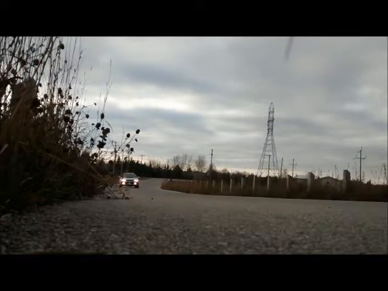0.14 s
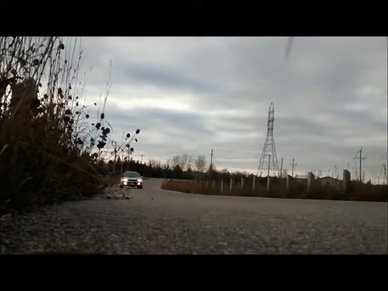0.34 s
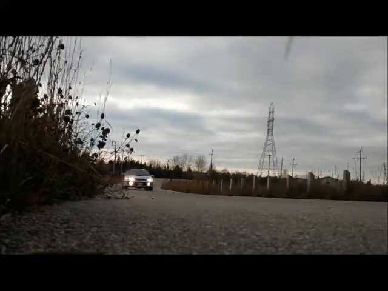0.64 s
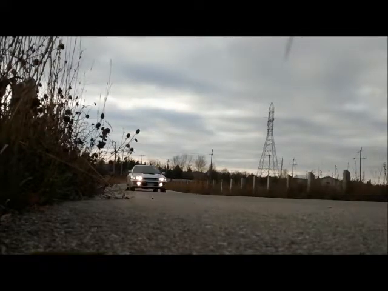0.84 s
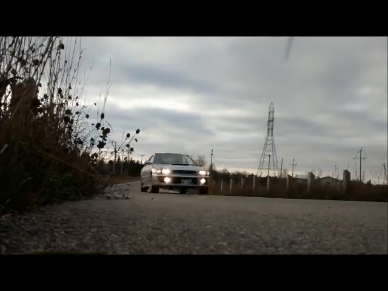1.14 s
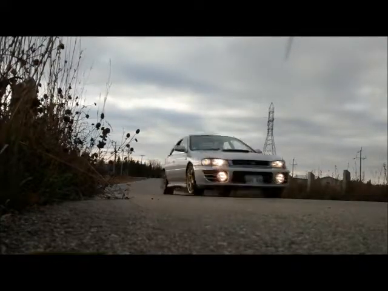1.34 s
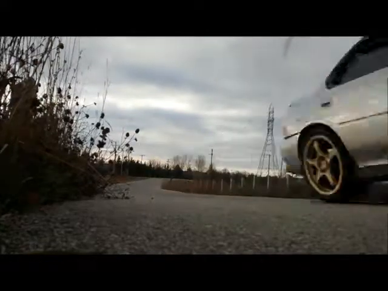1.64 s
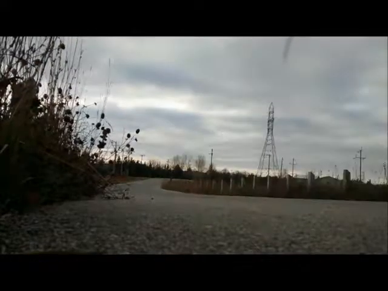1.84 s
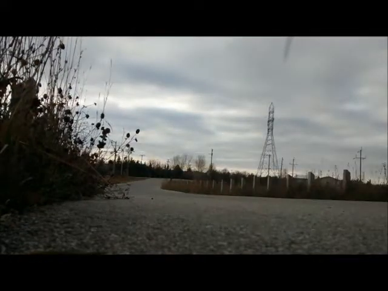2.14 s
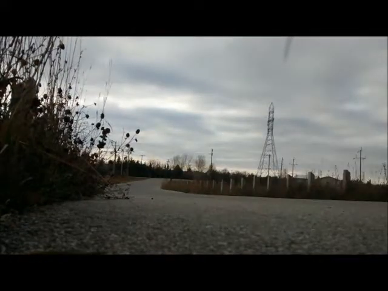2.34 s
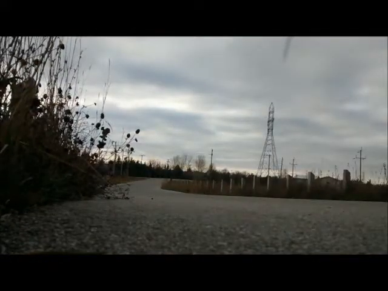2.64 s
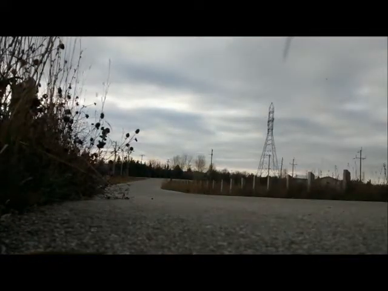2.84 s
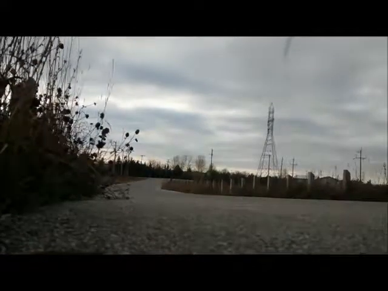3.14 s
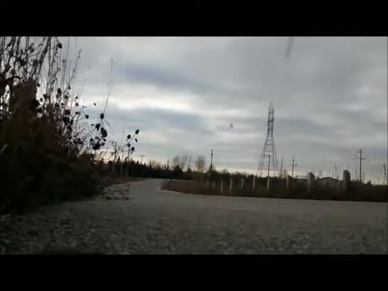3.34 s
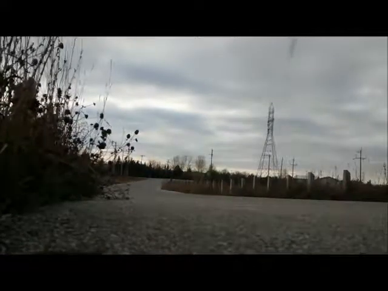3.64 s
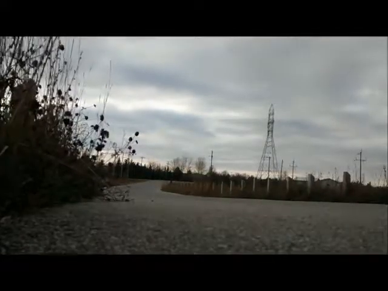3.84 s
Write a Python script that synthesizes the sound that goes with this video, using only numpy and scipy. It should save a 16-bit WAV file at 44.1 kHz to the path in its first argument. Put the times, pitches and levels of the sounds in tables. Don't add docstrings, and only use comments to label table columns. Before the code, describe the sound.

A throbbing four-cylinder car lifts off with an air hiss, passes loudly, then fades to idle.

```python
import sys
import numpy as np
from scipy import signal
from scipy.fft import rfft, irfft, next_fast_len
from scipy.io import wavfile
from scipy.ndimage import map_coordinates

SR = 44100
rng = np.random.default_rng(int(sys.argv[2]) if len(sys.argv) > 2 else 0)


def rack_gain(trim_db):
    fader = np.asarray(trim_db, float)
    return 10 ** (fader / 20)


def inscribe(sig):
    pcm = np.round(np.clip(np.atleast_2d(sig).T, -1, 1) * 32767)
    wavfile.write(sys.argv[1], SR, pcm.astype(np.int16))


N = 176400
TIME_S = np.arange(N) / SR
DUCK_DB = -11


# start_s, cycle_rate_hz, level_db, side_seen
ENGINE = [(0, 34.2, -10.5, 0), (.855, 39, -8.5, 0), (.9, 36.6, -11, 1), (1.1, 33.3, -7.5, 1),
          (1.46, 28.1, -6, 1), (1.66, 25.1, -7, 1.25), (1.8, 23, -3.5, 1.9), (1.97, 20.1, -1, 2),
          (2.16, 17.1, -7, 2), (2.36, 15.1, -15, 2.15), (2.56, 13.1, -18, 2.7), (2.76, 11.2, -24, 3),
          (2.96, 9.5, -25, 3.2), (3.3, 8.8, -29, 4), (3.6, 8, -39, 4), (4, 8, -38, 4)]
ORDER_DB = [
    [-25, -19, -10, 0, -6, -17, -24, -11, -13, -26, -30, -18, -17, -33, -26, -24, -27],
    [-30, -26, 0, -6, -16, -26, -20, -28, -25, -31, -34, -31, -29, -31, -30, -28, -34],
    [-42, -32, -21, 0, -9, -28, -16, -18, -30, -40, -30, -29, -30, -36, -34, -32, -36],
    [-50, -34, -28, -1, -19, -19, -2, -1, -3, -21, -5, -12, -19, -30, -30, -30, -30],
    [-30, -25, -10, -16, -14, -4, -4, 0, -2, 0, -1, -3, -10, -25, -25, -25, -25],
]
# frequency_hz, level_db
RUMBLE = [(20, -2), (60, 1), (200, -3), (450, -8), (750, -19), (1000, -42), (2000, -70), (5000, -120)]
# start_s, level_db, pitch_hz
THUMPS = [
    (.864, -15, 70),
    (.932, -4.5, 104),
    (3.7, -25, 79),
    (3.772, -20, 79),
    (3.838, -20, 79),
    (3.897, -17.5, 79),
    (3.931, -17, 78.5),
    (3.949, -10.5, 79),
    (3.99, -15, 78.6),
]


def exhaust():
    rate_hz, level_db, side = curves(ENGINE)
    turn = 2 * np.pi * np.cumsum(rate_hz) / SR
    wander = 0.045 * 1.8 ** np.clip(side - 2, 0, 2)
    tone = 0
    for order, row in enumerate(np.transpose(ORDER_DB), 1):
        order_db = np.interp(side, np.arange(len(row)), row) + 0.9 * wobble(7.15)
        phase = order * (turn + wander * wobble(8.96))
        tone = tone + rack_gain(order_db) * np.sin(phase + rng.uniform(0, 2 * np.pi))
    beat = np.cos(turn)
    rumble = rack_gain(-16 + 2.2 * (wobble(10) + beat)) * noise(RUMBLE)
    out = rack_gain(level_db) * (tone + rumble)
    t, thump_t60_s = np.arange(SR // 8) / SR, 0.13
    for start_s, thump_db, pitch_hz in THUMPS:
        thump = 2.0 * rack_gain(thump_db - 60 * t / thump_t60_s) * np.sin(2 * np.pi * pitch_hz * t)
        add(out, start_s, thump)
    return out, beat, side


def exhaust_at_ports(pipe, side):
    leak, leak_hz = 0.054, 347
    soft = lambda hz: 1 / (1 + (hz / leak_hz) ** 4)
    quarter_turn = np.interp(side, [1, 2], (0.017, 0.079)) * filtered(pipe, lambda hz: 1j * soft(hz))
    common = leak * filtered(pipe, soft) - quarter_turn
    return np.array([pipe, -pipe]) * (1 - leak) + common


# start_s, pitch_hz, difference_db, sum_db
DRONE = [(0, 600, -44, -82), (.8, 600, -29, -45), (1, 470, -42, -60), (1.4, 450, -28, -63),
         (1.53, 450, -23, -47), (1.61, 450, -29, -52.5), (1.72, 450, -18, -53), (1.85, 420, -44, -53),
         (2.03, 390, -33, -29.5), (2.2, 400, -48, -47.5), (2.4, 380, -50, -52.5), (4, 340, -44, -61)]


def drone(beat):
    pitch_hz, side_db, mid_db = curves(DRONE)
    width_hz, beat_db = 41, 4.5
    side = rack_gain(side_db) * narrow(pitch_hz, width_hz) * [[1], [-1]]
    mid = rack_gain(mid_db) * narrow(pitch_hz, width_hz)
    return rack_gain(beat_db * beat) * (side + mid)


# start_s, level_db, side_seen (0 nose-on, 1 beside, 2 behind, 3 far)
ROAD = [(0, -34, 0), (.5, -31, 0), (.7, -31, 0), (.84, -28.5, 0), (1.1, -32, 0), (1.45, -30.5, 1.01),
        (1.62, -25, 0.56), (1.7, -20.5, 1.38), (1.76, -18, 1.83), (1.82, -24, 1.7), (1.9, -23.5, 2),
        (2, -27, 2), (2.1, -29, 2), (2.2, -34, 2), (2.36, -37, 3), (2.5, -39.5, 3), (3.6, -42.5, 3),
        (4, -33.5, 4)]
# frequency_hz, level_db
ROAD_MID = [
    [(260, -13), (450, -17.5), (680, -13.5), (1230, -2.5), (1480, -12), (2270, -16.5), (3490, -1.5),
     (4480, -20), (15200, -47)],
    [(180, -28), (300, -13), (452, -12.5), (753, -8.5), (858, -5.5), (1680, -0.5), (2540, -9.5),
     (3470, -10.5), (15200, -49)],
    [(170, -10), (364, -6), (477, -2.5), (985, -3), (1580, -6.5), (2270, -25.5), (3550, -13.5), (5300, -30),
     (15200, -47.5)],
    [(90, -26), (400, -3.5), (1100, -0.5), (1850, -2), (2400, -14.5), (3400, -8.5), (5400, -33.5),
     (15200, -39)],
]
# frequency_hz, level_db
ROAD_SIDE = [
    [(330, -29), (560, -3), (1130, -13.5), (2630, -7), (4040, -26), (5200, -35), (6190, -44), (15200, -54)],
    [(310, -32), (520, -11), (889, -4), (1270, -15), (2320, -3.5), (6610, -31), (9670, -51), (15200, -66)],
    [(180, -3), (300, -4.5), (410, -5.5), (1010, -36), (2580, -20), (5310, -44), (8700, -55), (15200, -62)],
    [(76, -13), (130, 3.5), (277, -6.5), (338, 1), (1010, -29), (1770, -23), (5610, -37.5), (15200, -79)],
]
ROAD_SIDE_DB = [6.04, 1.8, 6, 6.7]
# start_s, level_db
WIDTH = [(0, -0.5), (.8, -1), (1.1, 1), (1.4, 5), (1.62, 0.5), (1.8, -2), (2, -1), (2.35, -1), (2.5, 0),
         (4, 1.5)]
# frequency_hz, left_over_right_db
LEAN = [
    [(500, 0), (800, -2), (1150, 0.5), (1400, 7), (1800, 3.5), (2300, -1.5), (3200, -7), (4500, -1)],
    [(300, 2), (600, 10), (1200, -1), (1700, -5), (2300, -3), (3200, -12), (4500, -7.5), (9000, -5)],
]


def road(beat):
    level_db, side = curves(ROAD)
    width_db, = curves(WIDTH)
    roar = 0
    for view in range(4):
        heard = np.clip(1 - abs(side - view), 0, 1)
        colour = pair(ROAD_MID[view], ROAD_SIDE[view], ROAD_SIDE_DB[view] + width_db, LEAN[view > 1])
        roar = roar + np.sqrt(heard) * colour
    swing_db = 0.5 * beat + 1.19 * wobble(12) + 0.77 * wobble(39.98)
    return rack_gain(level_db + swing_db) * roar


# frequency_hz, level_db
VALVE_MID = [(1470, -48), (2500, -9), (3460, 0.5), (4540, -12), (5440, -6.5), (6050, -16), (11300, -23),
             (15200, -40)]
# frequency_hz, level_db
VALVE_SIDE = [(1060, -23), (1800, 1), (2480, -5), (3810, -6), (4360, -8.5), (6120, -24), (12500, -39),
              (15200, -44)]
# centre_s, level_db, half_length_s
GULPS = [
    (3.93, -47, 0.018),
    (3.954, -37, 0.022),
    (4, -37.5, 0.015),
]
# frequency_hz, level_db
GULP_COLOUR = [(300, 3), (4500, -3), (12000, -10), (15500, -40)]


def valve():
    after_s = TIME_S - 0.855
    attack_s, hold_s, swell_s = 0.0094, 0.28, 0.14
    swell_db = -2.5 * np.clip(1 - after_s / swell_s, 0, 1)
    fade_db = -45 * np.clip(after_s - hold_s, 0, 2)
    hiss = np.clip(after_s / attack_s, 0, 1) * rack_gain(-31 + swell_db + fade_db + 0.41 * wobble(17.1))
    gulp = 0
    for centre_s, level_db, half_s in GULPS:
        gulp = gulp + rack_gain(level_db) * np.exp(-((TIME_S - centre_s) / half_s) ** 2)
    vent = hiss * pair(VALVE_MID, VALVE_SIDE, 6.5, LEAN[0])
    return vent + gulp * pair(GULP_COLOUR, GULP_COLOUR, 0, LEAN[1])


# start_s, pitch_hz, level_db
WHINE = [
    (0, 1233, -43),
    (.8, 1200, -44),
    (.95, 1081, -36),
    (1.5, 1021, -40.5),
    (1.62, 1125, -30.5),
    (1.75, 931, -27),
    (1.9, 920, -46),
]


def whine():
    pitch_hz, level_db = curves(WHINE)
    sounding = np.arange(N) < WHINE[-1][0] * SR
    return rack_gain(level_db) * sounding * narrow(pitch_hz, 140)


# start_s, peak_db, pitch_hz
TICKS = [
    (2.969, -38, 1810),
    (3.064, -25, 1430),
    (3.308, -32, 3020),
    (3.482, -38, 4000),
    (3.529, -27.5, 1340),
    (3.727, -38, 2200),
    (3.804, -34, 4180),
    (3.803, -35, 9000),
]


def grit():
    out, t = np.zeros(N), np.arange(200) / SR
    for when, loudness, size in rng.standard_normal((120, 3)):
        start_s = 1.78 + 0.13 * when
        level_db = GRIT_DB + 5 * loudness - 6 * when ** 2
        pitch_hz = 1600 * np.exp(0.65 * size)
        add(out, start_s, rack_gain(level_db - 20 * pitch_hz * t) * np.sin(2 * np.pi * pitch_hz * t))
    for start_s, peak_db, pitch_hz in TICKS:
        rise = 1 - np.exp(-pitch_hz * t / 0.37)
        decay = rack_gain(peak_db - DUCK_DB - 10 * pitch_hz * t)
        add(out, start_s, decay * rise * np.sin(2 * np.pi * pitch_hz * t))
    return out * rack_gain([[-2.1], [1.9]])


STONE_S = 2.3714
# frequency_hz, level_db
STONE = [
    [(3800, -14), (6900, -4), (9300, -14), (12000, -11), (14400, -15)],
    [(2200, -14), (6500, -9), (8700, -10), (12300, -5), (14400, -10)],
]


def stone():
    out, t = np.zeros((2, N)), np.arange(-40, 100) / SR
    peaks_s, widths_s = (0.00046, 0.00018), (0.00025, 0.0003)
    for port, modes, peak_s, width_s in zip(out, STONE, peaks_s, widths_s):
        ring = sum(rack_gain(db) * np.cos(2 * np.pi * hz * (t - peak_s)) for hz, db in modes)
        add(port, STONE_S + t[0], ring * np.exp(-((t - peak_s) / width_s) ** 2))
    return out * [[-1], [1]]


def hush():
    flat = [(100, 0)]
    return rack_gain(-67) * pair(flat, flat, 0, flat)


# frequency_hz, share_heard_by_both
PORTS_ALIKE = [(500, .6), (2000, .8), (5200, .8), (6300, .95), (12000, .95)]


def pair(mid, side, side_db, lean):
    both, own_mid, own_side = rng.standard_normal((3, N))
    lag_s, comb_from_hz = 0.00039, 5200

    def alike(hz):
        return np.clip(along(PORTS_ALIKE, hz), 0, 0.99)

    def comb(hz, wave):
        depth = 1.33 + (comb_from_hz / (hz + 1)) ** 4
        return 1.24 * np.tanh(depth * wave(np.pi * hz * lag_s))

    def blend(own, turn, wave, points):
        shared = filtered(both, lambda hz: rack_gain(along(points, hz)) * turn * alike(hz) * comb(hz, wave))
        separate = filtered(own, lambda hz: rack_gain(along(points, hz)) * np.sqrt(1 - alike(hz) ** 2))
        return unit(shared + separate)

    m = blend(own_mid, -1j, np.sin, mid)
    s = rack_gain(side_db) * blend(own_side, 1, np.cos, side)
    tilt = lambda hz: rack_gain(np.minimum(along(lean, hz) * np.array([[1], [-1]]), 0))
    return filtered(np.array([m + s, m - s]), tilt)


def narrow(hz, width_hz):
    turn = 2 * np.pi * np.cumsum(hz) / SR
    return wobble(width_hz) * np.cos(turn) + wobble(width_hz) * np.sin(turn)


def noise(spectrum):
    return unit(filtered(rng.standard_normal(N), lambda hz: rack_gain(along(spectrum, hz))))


def wobble(rate):
    knots = rng.standard_normal(int(N * rate / SR) + 4)
    return map_coordinates(knots, [np.arange(N) * rate / SR])


def filtered(x, response):
    m = next_fast_len(N + 8192)
    return irfft(rfft(x, m) * response(np.fft.rfftfreq(m, 1 / SR)), m)[..., :N]


def along(points, hz):
    f, v = np.transpose(points)
    return np.interp(np.log(hz + 1), np.log(f + 1), v)


def curves(rows):
    s, *cols = np.transpose(rows)
    return [np.interp(TIME_S, s, c) for c in cols]


def unit(x):
    return x / np.sqrt(np.mean(x ** 2) + 1e-20)


def add(into, s, ring):
    part = into[round(s * SR):][:len(ring)]
    part += ring[:len(part)]


GRIT_DB = -27


def scene():
    pipe, beat, side = exhaust()
    car = exhaust_at_ports(pipe, side) + drone(beat) + road(beat) + valve() + whine() + grit()
    duck = rack_gain(DUCK_DB * np.clip((TIME_S - STONE_S) / 0.004, 0, 1))
    return filtered(car * duck + hush(), lambda hz: hz < 15200) + stone()


def roll_off(x):
    return signal.sosfilt(signal.butter(12, 16810, fs=SR, output="sos"), x)


def record(dry):
    clipped = dry / (1 + abs(dry) ** 12) ** (1 / 12)
    return roll_off(clipped)


dry = scene()
out = record(dry)
inscribe(out)
```